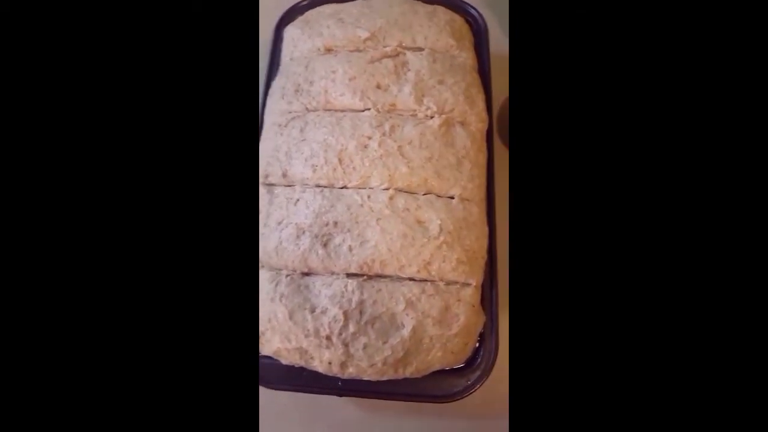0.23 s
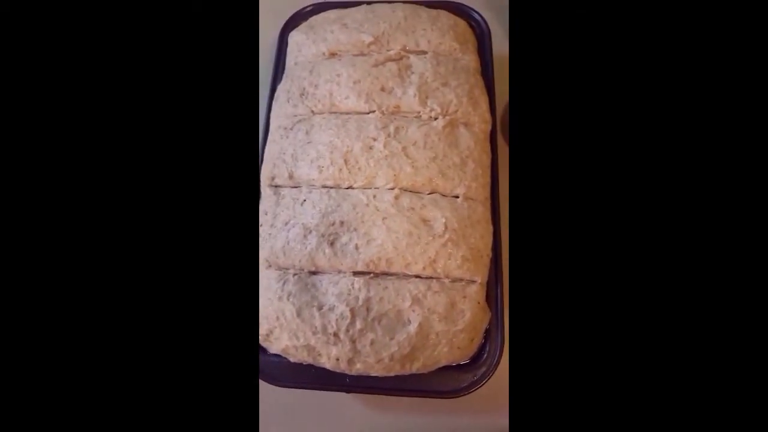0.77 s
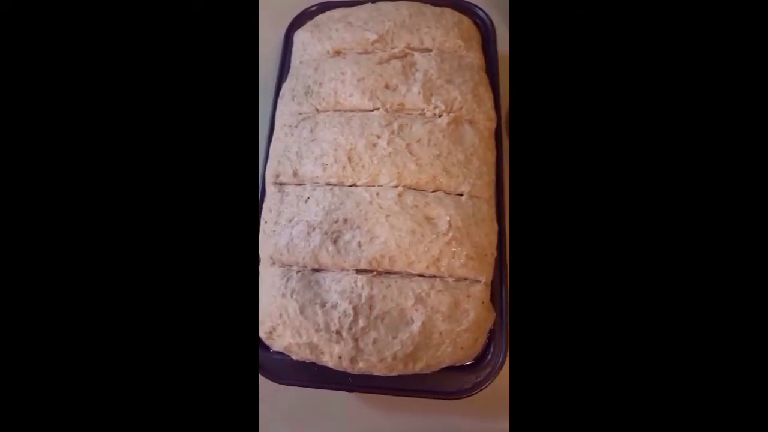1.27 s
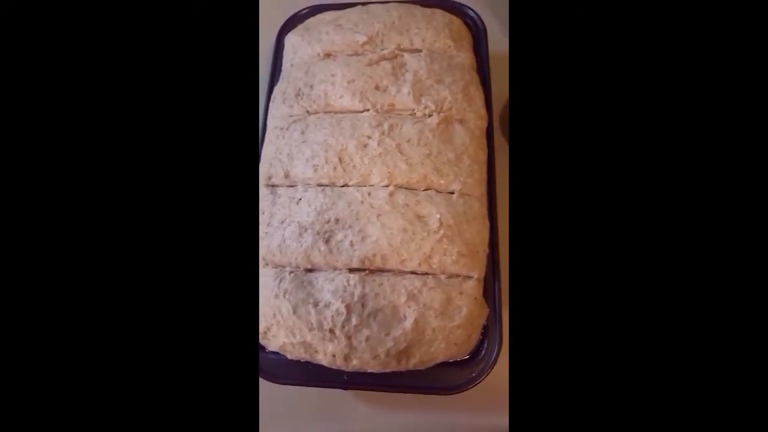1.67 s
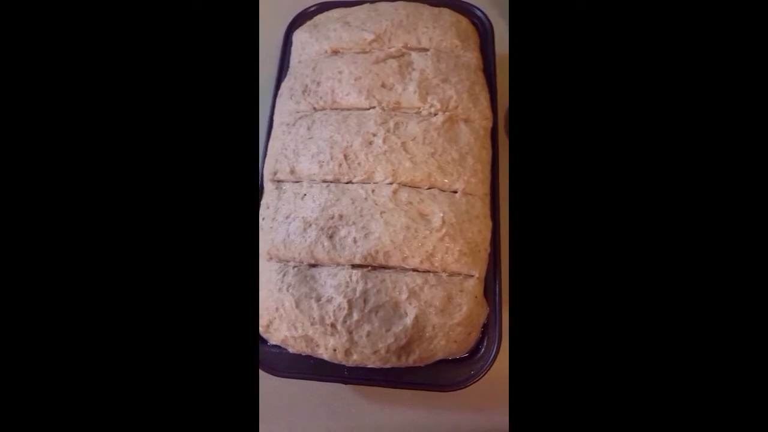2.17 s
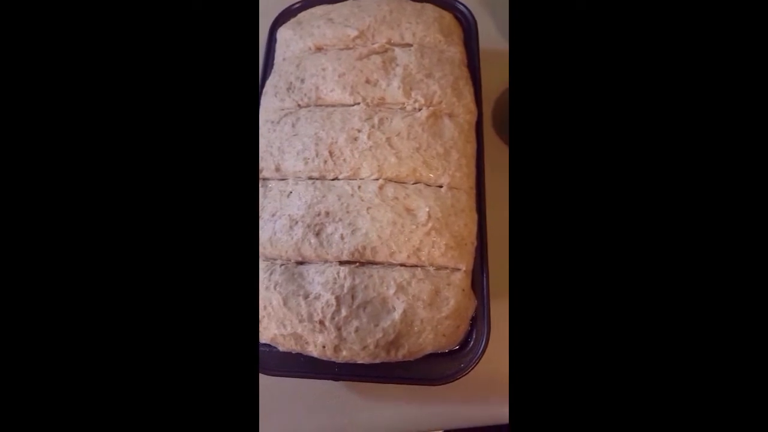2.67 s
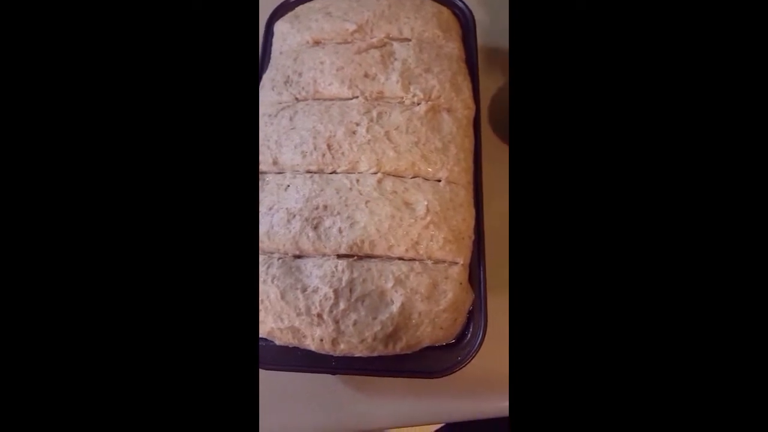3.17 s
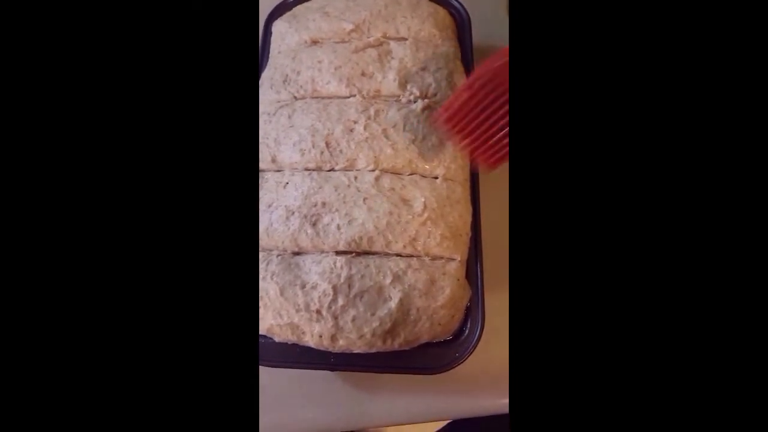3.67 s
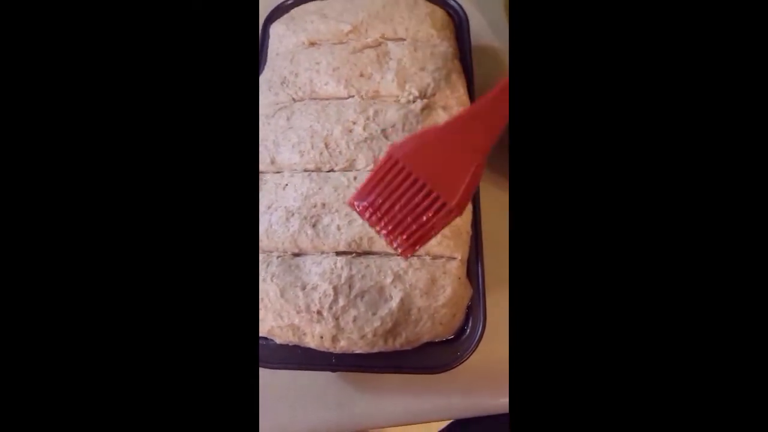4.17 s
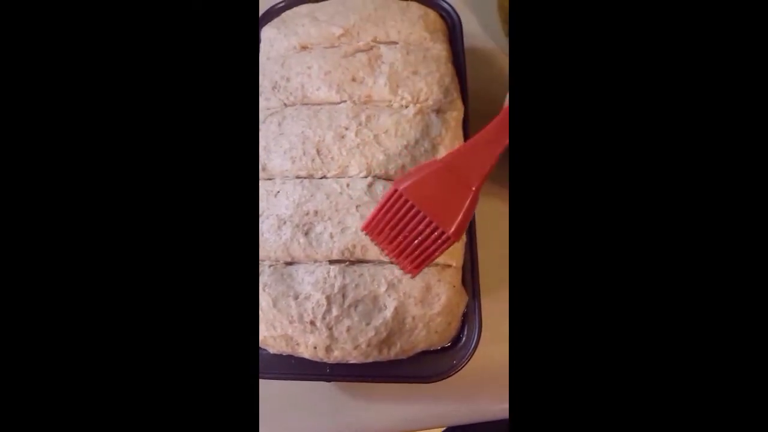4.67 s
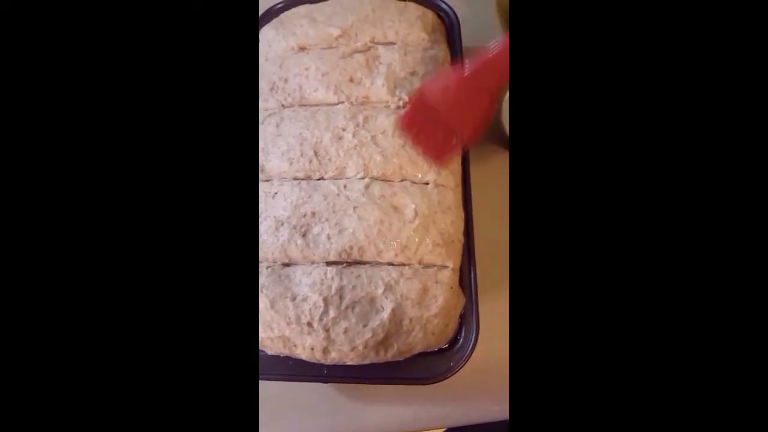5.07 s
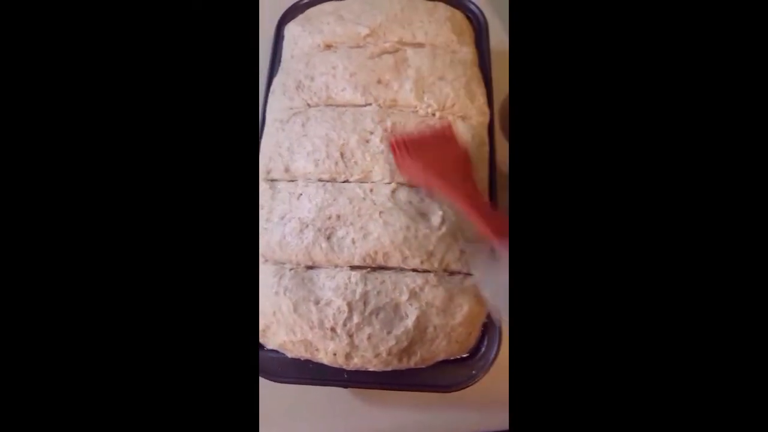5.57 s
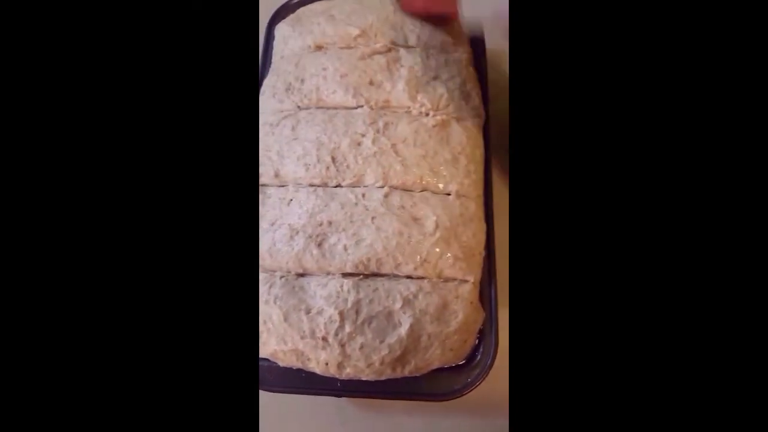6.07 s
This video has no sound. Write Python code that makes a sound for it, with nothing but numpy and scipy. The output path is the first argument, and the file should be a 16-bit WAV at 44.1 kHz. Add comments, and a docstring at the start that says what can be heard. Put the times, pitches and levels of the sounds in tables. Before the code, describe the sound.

A small home kitchen, heard closely through one microphone on the left, while the right carries only faint hiss. A quiet appliance hums throughout with a low, slightly wavering motor tone and soft fan rush. A sleeve rustles lightly in strokes from the start. At 0.35 s a utensil lands on the counter with a short firm knock, followed by a much softer one at 0.65 s. At 1.4 s comes the loudest: a sharp double hit of a hard knife on the counter, rattling and settling until about 1.65 s. A duller knock follows at 2.2 s and a solid, lower-pitched one at 2.6 s with a small bump after it. Counter and tray ring briefly. Cloth swishes around 3 s, with faint brush ticks at 3.1 to 3.25 s. Then mostly hum, until tiny dry ticks, scuffs and rustles return from 5.2 to 6.3 s.

```python
"""Small kitchen, one live microphone on the left; the right channel has its own hiss and a trace of leak.
Throughout, an appliance hums (drifting tones, coloured fan noise) and a sleeve rustles in strokes (shaped noise).
From 0.35 to 2.6 s a knife and utensils are put down on the counter beside a baking tray: five short knocks,
the loudest with a rattle (contact pulses and soft side contacts, ringing through counter, tray and room).
From 3.1 s a pastry brush and sleeve tick faintly, and again from 5.2 to 6.3 s (tiny snaps and scuffs)."""
import sys
import numpy as np
from scipy import signal
from scipy.fft import rfft, irfft
from scipy.io import wavfile

SR = 44100
rng = np.random.default_rng(int(sys.argv[2]) if len(sys.argv) > 2 else 0)


def master(y):
    """Save y as 16-bit WAV."""
    cut = np.clip(np.atleast_2d(y).T, -1, 1)
    pcm = np.round(cut * 32767)  # scale
    wavfile.write(sys.argv[1], SR, pcm.astype(np.int16))


N = 278712  # samples, 6.32 s
FREQS = np.fft.rfftfreq(N, 1 / SR)  # Hz
RING = np.arange(SR // 2) / SR  # time axis of one ringing sound, s


def amp(db):
    """Decibels to gain."""
    return 10 ** (np.asarray(db) / 20)


def read(points, hz, axis=1):
    """One column of a spectrum table, interpolated on a log-frequency axis."""
    table = np.transpose(points)
    return np.interp(np.log(hz + 1), np.log(table[0] + 1), table[axis])


def add(mix, s, sound):
    """Mixes a sound in at time s, cut where the mix ends."""
    part = mix[max(round(s * SR), 0):][:len(sound)]
    part += sound[:len(part)]


def evened(x):
    """Scales to rms 1."""
    return x / np.sqrt(np.mean(x ** 2) + 1e-30)


def noise(gain):
    """Gaussian noise with the given amplitude per root Hz."""
    return irfft(rfft(rng.standard_normal(N)) * gain, N) * np.sqrt(SR / 2)


def pulse(gain, size=2048):
    """Minimum-phase pulse: the most sudden causal one that has the spectrum gain(Hz)."""
    hz = abs(np.fft.fftfreq(2 * size, 1 / SR)) + 1
    log_gain = np.log(np.maximum(gain(hz), 1e-5))
    spectrum = np.exp(np.conj(signal.hilbert(log_gain)))
    return np.fft.ifft(spectrum).real[:size]


# steady tones of the appliance's motor: (frequency [Hz], level [dB rms])
MOTOR_TONES = [(59, -78.5), (119.8, -66.5), (197, -63), (392.8, -68.5), (884, -76.5), (1003, -84),
               (1063, -82.5), (1121, -73.5), (1298, -80), (1361, -68.5)]
# rush of the appliance's fan: (frequency [Hz], density [dB per Hz])
FAN_RUSH = [(30, -102), (85, -92), (160, -87.5), (250, -85.5), (340, -81), (490, -90), (600, -93.5),
            (950, -93), (1350, -95.5), (1480, -104), (2100, -111), (3500, -113), (6000, -128)]
# resonances of casing and air path: (frequency [Hz], width at -6 dB [Hz], level [dB rms])
CASING_BANDS = [(53.3, 14, -75.5), (120.2, 8.1, -77.5), (158, 35, -68.5), (197.2, 9.9, -68), (291, 41, -68),
                (310, 32, -61.5), (351.5, 7.5, -71), (384.3, 35, -67), (517, 13, -72), (718, 30, -67),
                (1076, 24, -74.5), (1144, 59, -78), (2400, 47, -88), (2690, 29, -84), (4060, 23, -89.5)]


def appliance(drift_hz=0.44, drifts_per_s=3):
    """Slowly drifting motor tones over a fan's rush, coloured by the casing."""
    t = np.arange(N) / SR
    tones = 0
    for hz, db in MOTOR_TONES:
        drift = np.interp(t * drifts_per_s, np.arange(100), rng.standard_normal(100))
        turns = np.cumsum(hz + drift_hz * drift) / SR + rng.random()
        tones = tones + amp(db) * np.sqrt(2) * np.sin(2 * np.pi * turns)
    power = amp(read(FAN_RUSH, FREQS)) ** 2
    for hz, width, db in CASING_BANDS:
        shape = 1 / (1 + ((FREQS - hz) / (width / 2)) ** 2) ** 2
        power = power + amp(db) ** 2 * shape / (shape.sum() * SR / N)
    return tones + noise(np.sqrt(power))


# colour of cloth on cloth: (frequency [Hz], relative density [dB per Hz])
CLOTH_COLOUR = [(300, -45), (1200, 3.5), (3000, 7.5), (5500, 4.5), (8000, 4), (10500, 2), (12500, 2.5),
                (14300, 2)]
# sleeve strokes as the arm moves: (fastest moment [s], length [s], level before the sleeve's gain [dB])
SLEEVE_STROKES = [(0.167, 0.15, -72.5), (0.317, 0.25, -69), (0.51, 0.32, -75.5), (0.686, .14, -74.5),
                  (1.66, 0.22, -75.5), (1.905, 0.082, -70), (1.993, .16, -75), (2.45, 0.34, -79.5),
                  (2.736, 0.66, -79), (2.982, 0.2, -69), (3.077, .08, -67), (3.209, 0.29, -69),
                  (3.568, 0.3, -75.5), (5.487, 0.16, -66.5), (5.218, 0.22, -82), (5.745, 0.25, -80),
                  (6.152, 0.073, -70.5), (6.268, 0.13, -73)]
STROKE_SHARPNESS = 1.23  # a stroke speeds up and slows down in an arch; higher = more peaked
# between strokes the arm is never quite still; levels before the sleeve's gain
STIR_DB, STIR_SPREAD_DB, STIRS_PER_S = -88, 6.5, 7.3


def sleeve(gain_db=8, grain_db=3.0, grains_per_s=500):
    """Cloth slides in arched strokes: a hiss made uneven by fibres that catch and slip."""
    t = np.arange(N) / SR
    catch = np.interp(t * grains_per_s, np.arange(N), rng.standard_normal(N))
    stir = np.interp(t * STIRS_PER_S, np.arange(N), rng.uniform(-1.34, 1, N))
    power = amp(STIR_DB + STIR_SPREAD_DB * stir) ** 2
    for s, length, db in SLEEVE_STROKES:
        phase = np.clip((t - s) / length, -0.5, 0.5)
        arch = np.cos(np.pi * phase) ** STROKE_SHARPNESS
        power = power + (amp(db) * arch) ** 2
    hiss = noise(amp(read(CLOTH_COLOUR, FREQS)))
    return amp(gain_db) * np.sqrt(power) * evened(hiss * amp(grain_db * catch))


# light ticks of brush and sleeve:
# (time [s], level [dB], brightness [dB per octave], t60 [s], snap's share of the energy [0-1])
LIGHT_TICKS = [(3.135, -25.5, 0, .09, 0.02), (3.188, -30, 0, 0.037, 0.05), (3.234, -28.5, 4, 0.15, 0.3),
               (5.208, -35.5, -9, 0.069, 0.02), (5.241, -38.5, -9, 0.036, 0.1),
               (5.697, -31.5, -5.5, 0.069, 0.06), (5.8310, -25, -1.5, 0.046, 0.94),
               (5.884, -35, -8.5, 0.087, 0.24), (6.218, -37.5, -9, 0.059, 0.2),
               (6.2929, -30, 9, 0.057, 0.35), (6.309, -30, 5.5, 0.038, 0.06)]


def ticks(centre_hz=5000, low_hz=900, rise=0.0034):
    """A tiny snap and a dry scuff that dies at once."""
    out = np.zeros(N)
    for s, db, tilt_db, t60, snap in LIGHT_TICKS:
        def colour(f):
            tilt = tilt_db * np.log2(f / centre_hz)
            return amp(db + tilt) / np.hypot(1, (low_hz / f) ** 2)
        shape = (1 - np.exp(-RING / rise)) * amp(-60 * RING / t60)
        scuff = evened(rng.standard_normal(len(RING)) * shape)
        touch = scuff * np.sqrt((1 - snap) / len(RING))
        touch[0] = np.sqrt(snap)
        add(out, s, signal.fftconvolve(touch, pulse(colour)))
    return out


def tail(level_db, t60, rise, grain_db=2, grains_per_s=500, size=256):
    """Countless overlapping rings that arrive in clumps: each band has its own energy and decay time."""
    clumps = np.interp(RING * grains_per_s, np.arange(len(RING)), rng.standard_normal(len(RING)))
    grains = evened(rng.choice([-1, 1], len(RING)) * amp(grain_db * clumps))
    hz, t, bands = signal.stft(grains, SR, nperseg=size)
    rate = np.log(1000) / t60(hz)[:, None]  # 1/s
    energy_norm = np.sqrt(2 * rate / SR)
    bands = bands * amp(level_db(hz))[:, None] * energy_norm * np.exp(-rate * t)
    return signal.istft(bands, SR, nperseg=size)[1][:len(RING)] * (1 - np.exp(-RING / rise))


# returns from nearby tray, wall and cupboards: (delay [s], gain [linear])
NEAR_ECHOES = [(.0027, .55), (.0061, .4), (0.0109, .35), (0.0138, -.3), (0.023, .2), (0.0291, .15)]
# what counter, tray and knife ring with: (frequency [Hz], level over the bare blow [dB], t60 [s])
RING_MODES = [(205.6, 13, 0.12), (302.4, 9, 0.35), (312.2, 15, 0.17), (404, 12.5, .2), (445, 8, .16),
              (497, 3, 0.11), (616, 9.5, 0.31), (674, 15, 0.3), (787, -8, 0.66), (863.7, 11.5, 0.078),
              (1029, 7, 0.37), (1100, -4, 0.78), (1174, 10, 0.55), (1430, -10, 0.14), (1444, 14.5, 0.099),
              (1600, 0, 0.085), (1617, 13, 0.35), (1840, 11, .22), (2177, 15, 0.3), (2664, 15, 0.12),
              (3100, -15, .2), (3550, 0, .22)]
# dense ring of the counter and the kitchen's tail, both before each blow's room level:
# (frequency [Hz], counter level [dB], room level [dB], room t60 [s])
DENSE_TAILS = [(122, -33, 0, 1), (343, 3.5, -14, 0.37), (960, 2, -3.5, 0.38), (2000, 2, -0.5, 0.4),
               (3640, 3.5, -2.5, 0.34), (6450, -7.5, -20, 0.53), (13200, 4.5, -17, 0.87)]


def counter(room_db, ring_t60=0.11, treble_hz=6000):
    """Answer to one blow: direct sound, dulled near echoes, modes, dense ring and room."""
    out = np.zeros(len(RING))
    out[0] = 1
    blur = signal.windows.hann(11)[1:-1]
    for delay, gain in NEAR_ECHOES:
        add(out, delay, gain * blur / blur.sum())
    for hz, db, t60 in RING_MODES:
        rate = np.log(1000) / t60
        out += amp(db) * 2 * rate / SR * np.exp(-rate * RING) * np.cos(2 * np.pi * hz * RING)

    def dense_t60(f):  # treble dies sooner
        return ring_t60 / (1 + (f / treble_hz) ** 2)
    dense = tail(lambda f: read(DENSE_TAILS, f), dense_t60, rise=0.00068)
    room = tail(lambda f: read(DENSE_TAILS, f, axis=2), lambda f: read(DENSE_TAILS, f, axis=3), rise=0.003)
    return out + amp(room_db) * (dense + room)


def board(f, corner_hz, spots, low_hz=165, spot_width=0.079):
    """Gains of the dull contact and of the board, which radiates little bass and favours the spot's pitches."""
    contact = 1 / np.hypot(1, (f / corner_hz) ** 5)
    favoured = sum(db / (1 + (np.log(f / hz) / spot_width) ** 2) for hz, db in spots)
    body = amp(favoured) / np.hypot(1, (low_hz / f) ** 2.9)
    return contact, body


def travel(x, bass_delay=0.001577, knee_hz=1800):
    """Bending waves cross the counter more slowly the lower they are, which spreads the blow."""
    f = np.fft.rfftfreq(2 * len(x), 1 / SR)
    turns = 2 * bass_delay * knee_hz * (np.sqrt(1 + f / knee_hz) - 1)
    return irfft(rfft(x, 2 * len(x)) * np.exp(-2j * np.pi * turns))


# soft side contacts just before or after the blows, as things touch, rock and settle:
# (time [s], level [dB], pitch [Hz])
SIDE_CONTACTS = [(0.372, -3.5, 816), (0.6600, -6, 1026), (1.392, -5, 1054), (1.426, 2, 850),
                 (1.483, -6, 980), (1.535, -12.5, 325), (1.564, -12, 914), (1.624, -15, 1050),
                 (1.666, -16.5, 1050), (2.2465, -18, 471), (2.6213, -4, 502), (2.6465, -7.5, 680)]


def side_contacts(corner_hz=1250, spot_db=12, room_db=-4, rub_time=0.0031):
    """Soft contacts around the blows that rub for a moment and mostly sound one pitch."""
    out = np.zeros(N)
    for s, db, hz in SIDE_CONTACTS:
        def colour(f):
            contact, body = board(f, corner_hz, [(hz, spot_db)])
            return contact * body
        rub = evened(rng.standard_normal(len(RING)) * RING * np.exp(-RING / rub_time))
        force = signal.fftconvolve(rub / np.sqrt(len(RING)), pulse(colour))
        add(out, s, amp(db) * signal.fftconvolve(force, counter(room_db)))
    return out


# blows on the counter: (time [s], level [dB], contact corner [Hz], sharp tick [dB], tick reaches up to [Hz],
#                        bass [dB], lower pitch of the struck spot [Hz], its strength [dB],
#                        upper pitch [Hz], its strength [dB], room level [dB])
COUNTER_BLOWS = [(0.3517, 1.5, 1354, -8, 17350, 9, 554, 11.5, 3020, 7, 4),
                 (0.6478, -10, 1550, -24, 3940, -5, 1045, 8, 1580, 7.5, 7),
                 (1.3962, 2, 1432, -9, 15400, 0, 904, 5, 1440, 0, -6),
                 (1.3994, 9, 1523, -3, 9500, 1, 880, 9, 1570, 4.5, 2),
                 (2.1848, -1, 1090, -16, 2800, -9, 565, 9, 857, 9.5, -0.5),
                 (2.6153, 4.5, 1450, -22.5, 3890, -2.5, 497, 14.5, 763, 6, 4)]
# spectrum of a hard contact, before each blow's tick level: (frequency [Hz], level [dB])
HARD_CONTACT = [(500, -35), (2000, -5), (3200, -3), (4400, -7.5), (5400, -6), (6600, -11), (9000, -11.5),
                (10500, -23), (12500, -17), (14500, -15)]


def knocks(bass_hz=350):
    """A soft contact gives only lows; a steel edge adds a sharp tick."""
    out = np.zeros(N)
    for (s, db, corner_hz, tick_db, reach_hz, bass_db,
         low_hz, low_db, high_hz, high_db, room_db) in COUNTER_BLOWS:
        def force(f):
            contact, body = board(f, corner_hz, [(low_hz, low_db), (high_hz, high_db)])
            tick = amp(tick_db + read(HARD_CONTACT, f)) / np.hypot(1, (f / reach_hz) ** 4)
            bass = bass_db / (1 + (f / bass_hz) ** 4)
            return np.hypot(contact, tick) * body * amp(db + bass)
        blow = -travel(pulse(force))  # the first swing is negative
        add(out, s, signal.fftconvolve(blow, counter(room_db)))
    return out


def scene(leak_db=-58):
    """Everything reaches the left microphone; next to nothing leaks to the right."""
    kitchen = appliance() + sleeve() + ticks() + side_contacts() + knocks()
    return np.array([kitchen, amp(leak_db) * kitchen])


# the recorder's own hiss, midway between the two channels: (frequency [Hz], density [dB per Hz])
RECORDER_HISS = [(30, -103), (110, -98.5), (400, -103), (1000, -106.5), (2500, -110.5), (5000, -116),
                 (8000, -118.5), (10000, -120.5), (12500, -118), (14300, -116.5)]
EDGE_HZ = 14620  # upper band limit


def record(dry, offset=-0.00055):
    """Each channel adds its own hiss and the converter a small offset; then the band limit."""
    # left 1 dB below the table, right 1 dB above
    hiss = np.array([noise(amp(read(RECORDER_HISS, FREQS) + db)) for db in (-1, 1)])
    lowpass = signal.firwin(401, EDGE_HZ, window=("kaiser", 8), fs=SR)
    return signal.oaconvolve(dry + hiss + offset, lowpass[None], "same")


dry = scene()
out = record(dry)
master(out)
```